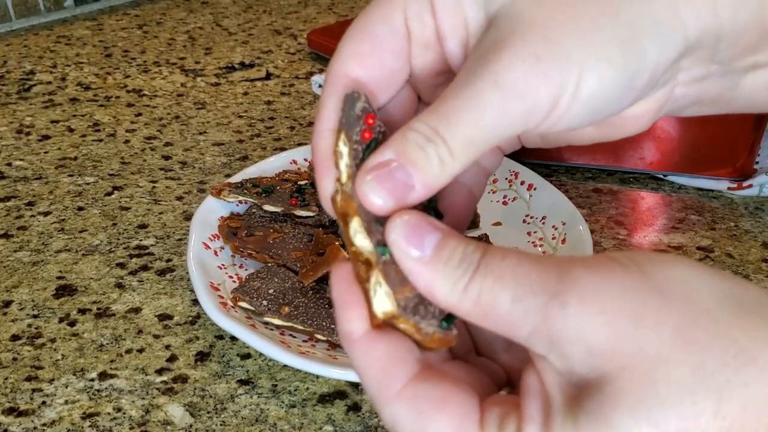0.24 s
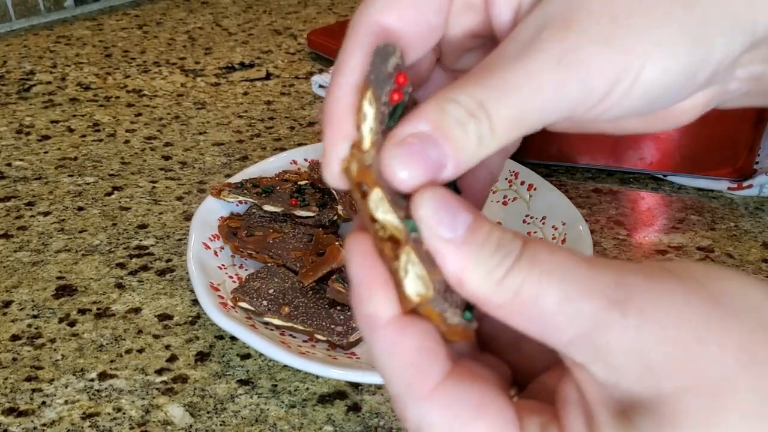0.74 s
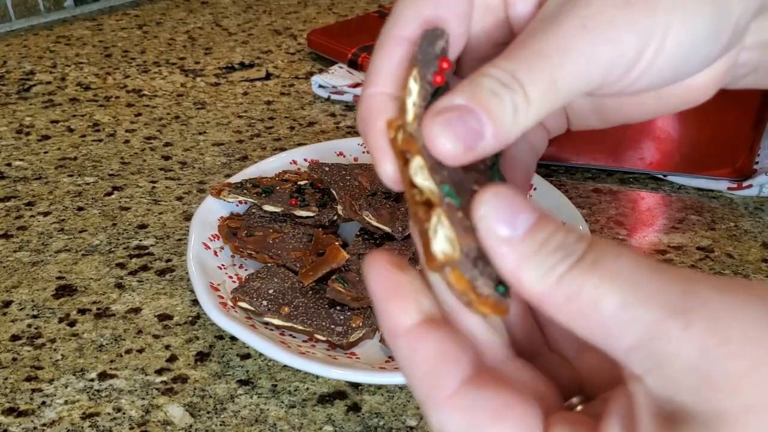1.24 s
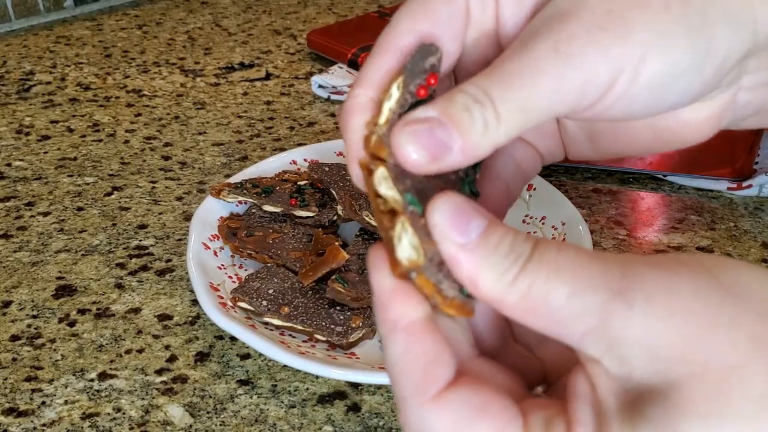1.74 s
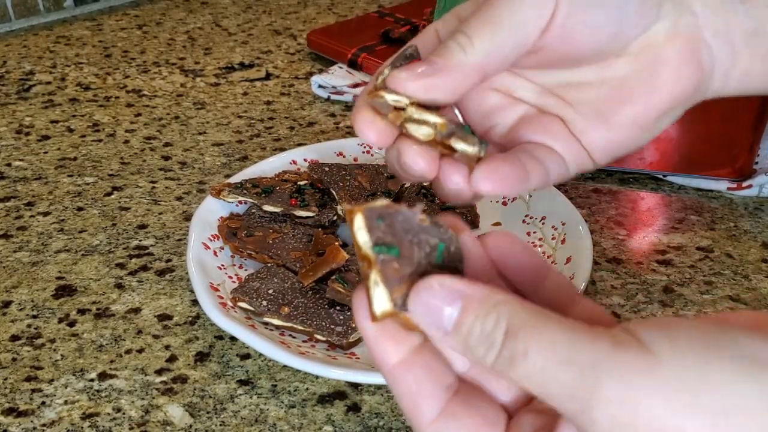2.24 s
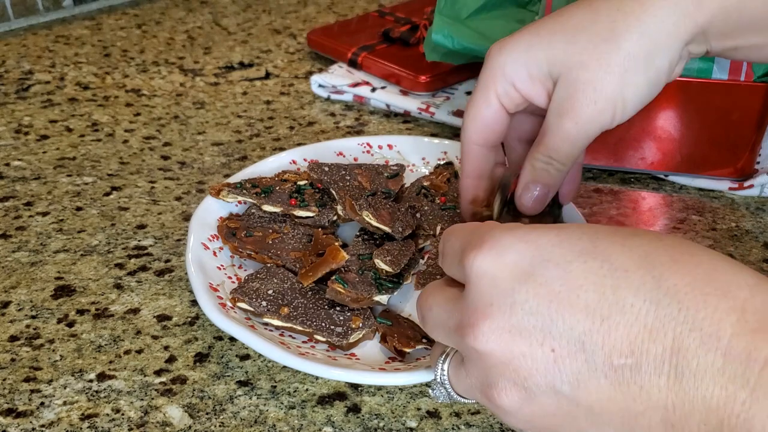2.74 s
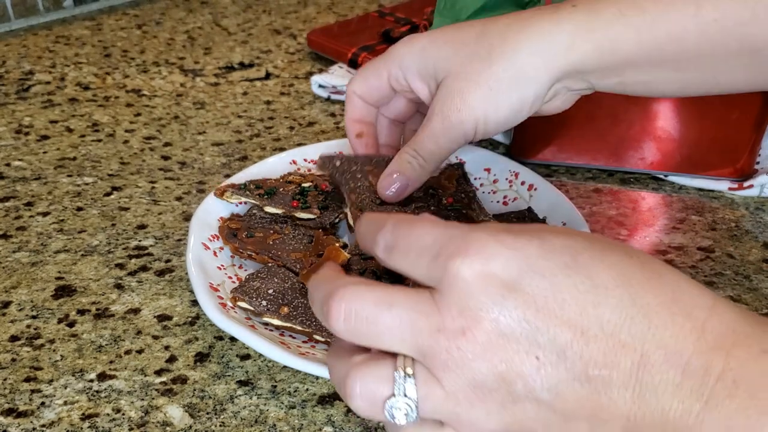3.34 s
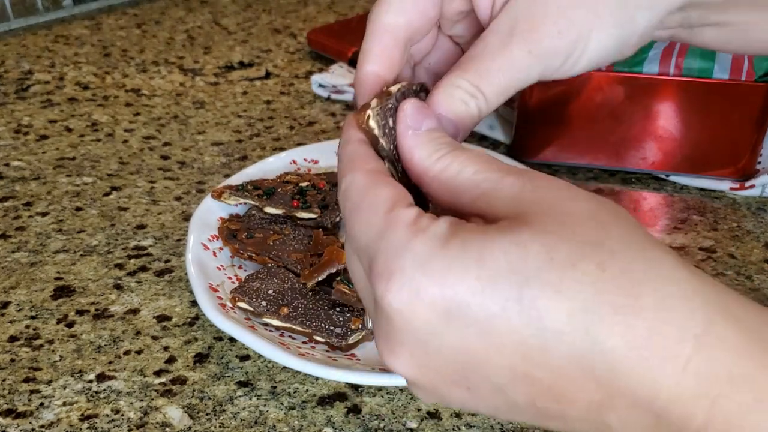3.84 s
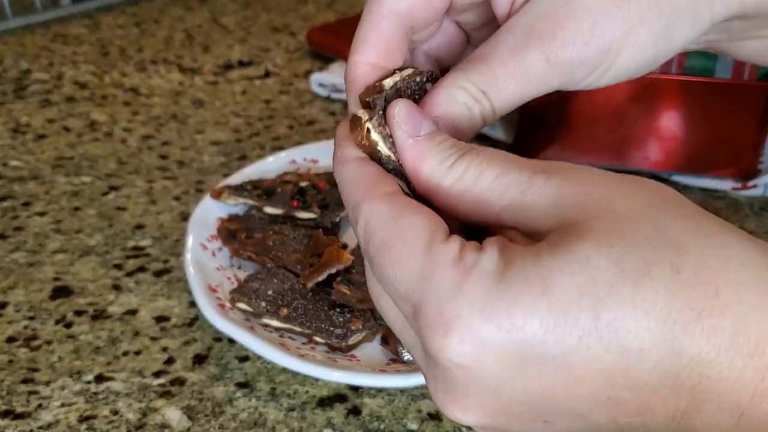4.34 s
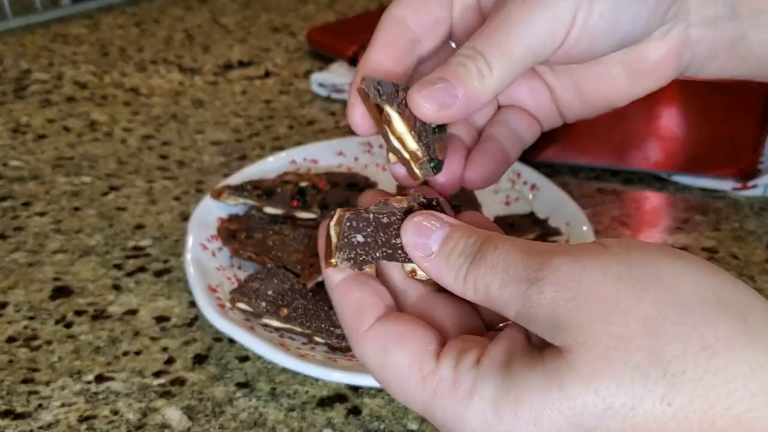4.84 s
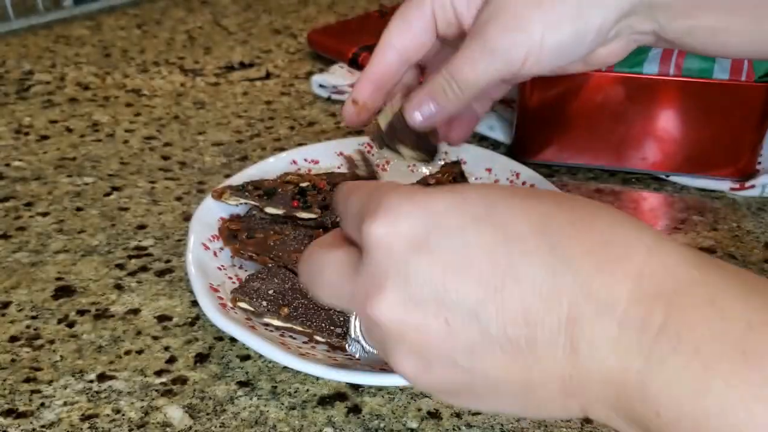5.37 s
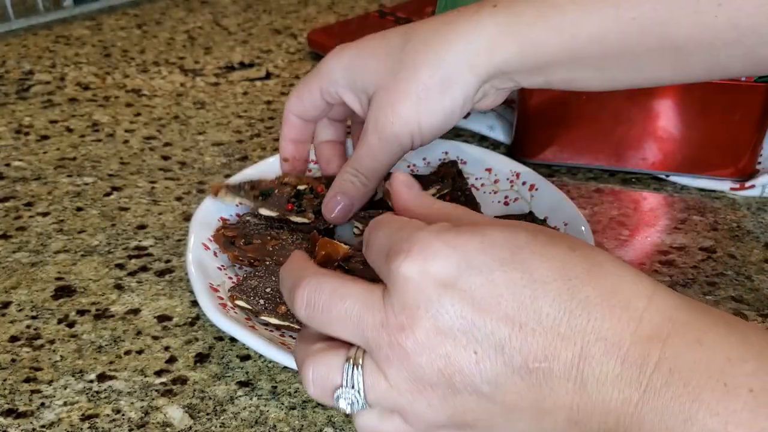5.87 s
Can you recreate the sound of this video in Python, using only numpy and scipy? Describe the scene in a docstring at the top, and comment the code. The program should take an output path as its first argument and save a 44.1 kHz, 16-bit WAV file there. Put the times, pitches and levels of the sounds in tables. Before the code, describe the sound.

Hard, bright fractures of toffee bark, each only an instant long, with tiny ticks before and after. Between two rounds of breaking, pieces rattle, scrape and crunch on a loaded china plate, giving brief clinks. Close stereo microphone, short bright answer from a small kitchen, faint tin shimmer, steady low hum and moving air underneath.

```python
"""A low appliance hum and moving air in a small kitchen, then toffee ticks under strain and cracks sharply.
Close up, hands bend and snap slabs of toffee pretzel bark over a china plate on a stone counter.
Fractures and ticks are short noise bursts; pieces knock with rattles and short modes, and ring the china.
Rubbing and dragging are random grains over hiss; a singing plate is narrow noise on one plate mode.
Dense, decaying noise answers as the room, a tin shimmers faintly, and one stereo microphone takes it all."""
import sys
import numpy as np
from scipy import signal
from scipy.fft import rfft, irfft, next_fast_len
from scipy.io import wavfile
from scipy.ndimage import map_coordinates

SR = 44100
rng = np.random.default_rng(int(sys.argv[2]) if len(sys.argv) > 2 else 0)


def file_out(sig):
    """Save sig as 16-bit WAV at sys.argv[1]."""
    # one column per channel
    cols = np.atleast_2d(sig).T
    # limit, then scale
    lim = np.clip(cols, -1, 1)
    pcm = np.round(lim * 32767).astype(np.int16)
    wavfile.write(sys.argv[1], SR, pcm)


N = 269421  # samples

# All levels are relative; pan_db is left over right.
# appliance tones: pitch_hz, level_db, waver (0-1)
HUM_TONES = [(57.3, -50, 0.9), (97.3, -55.5, 0.9), (120.3, -45, 0.2), (175.4, -70.5, 0.73),
             (272, -61.5, 0.9), (350.8, -67, 0.7)]
# shape of the moving air, before AIR_DB sets its level: pitch_hz, density_db (per Hz)
AIR_SPECTRUM = [(24, -31), (40, -5), (75, -6.5), (124, -7.5), (144, -16), (167, -9), (363, -16),
                (615, -28.5), (896, -31.5), (1210, -40.5), (1440, -40), (5870, -54), (14800, -48),
                (16000, -67)]
# how alike the air is left and right, negatives taken as 0: pitch_hz, likeness (0-1)
AIR_LEFT_RIGHT = [(60, 0.79), (150, 0.96), (380, 0.74), (950, -0.031), (2380, -0.84), (5980, -0.11),
                  (15000, -0.08)]
AIR_DB = -47.5

# slabs bent by hand, ticking at random: start_s, length_s, level_db
BEND_STROKES = [(.28, 0.27, -29), (1.2, .35, -35.5), (3.96, 0.34, -28.5), (4.93, 0.24, -31)]
# the clearest ticks: start_s, level_db, pan_db
CLEAR_TICKS = [(.074, -27.5, 0), (0.365, -23, -3), (0.384, -15.5, -1.5), (.693, -25.5, -6),
               (0.83, -21, -3.5), (.928, -21.5, -4), (.98, -23, 3), (1.2352, -21, -2), (1.305, -26, 2),
               (1.53, -17.5, -2.5), (4.131, -19.5, 5), (4.179, -21, 0), (4.473, -18, -3), (4.491, -17, -4),
               (4.606, -22.5, -2), (4.894, -22, -4.5), (4.9, -20, -2), (5.291, -28, -4)]
TICKS_PER_S, TICK_S, TICK_RISE_S = 26, .0014, .0002
TICK_SPREAD_DB, TICK_LOW_HZ = 3.5, 5500

# fractures: start_s, level_db, length_s, low_edge_hz, piece_pitch_hz, piece_level_db, pan_db
FRACTURES = [(0.138, 3, .0013, 2192, 2180, -10, 0.5), (.18, -8, .0022, 2900, 6900, -5, 2),
             (0.4855, 8, .0006, 4000, 9750, -4.5, -2.5), (0.4868, 6, 0.0015, 1300, 2450, -9, -8.5),
             (1.4517, -8, 0.0014, 2260, 3390, -8.5, -0.5), (1.5529, -1.5, .0018, 1200, 11300, 2, 10.5),
             (3.952, -15, 0.00078, 3510, 4260, -13, -1.5), (4.0, -13, .0015, 3750, 6500, -10.5, -1),
             (4.011, -9, .001, 4000, 12500, -10.5, -3.5), (4.024, -1, 0.00057, 4600, 4720, -7, -4),
             (4.046, -5.5, .0018, 4550, 13600, -4.5, 5), (4.2344, 11.5, 0.001, 2834, 6080, -0.5, -5),
             (4.2365, -7, 0.00059, 3004, 3340, 1, 1)]
# brightness of breaking toffee: pitch_hz, level_db
TOFFEE_COLOUR = [(900, 2), (2500, -6), (3500, -1), (4700, -8), (6300, 4), (8000, -5), (9700, 5.5),
                 (11000, -5.5), (13000, 2), (16000, 0.5)]
# brightness of a fracture as it spreads into the room: pitch_hz, level_db
SPREADING_COLOUR = [(300, 1.5), (1200, 1), (2500, -0.5), (4700, -3.5), (6300, -0.5), (9700, -0.5),
                    (16000, -2)]
TEAR_LEAD_S, TEAR_S, TEAR_DB = .0048, 0.0099, -18  # faint tearing ahead of each fracture
THUMP_DB, THUMP_GROWTH = -28, 2.09  # jerk of the hands at a 0 dB fracture; dB gained per dB of fracture
HALVES_ROOM_DB = -16  # the halves as sent to the room
TIN_DB, TIN_T60_S = -26, .48

# pieces touching the plate: start_s, knock_db, ring_db, hardness_hz (higher modes fade), crunch_db
PLATE_TOUCHES = [(2.766, -4.5, -23, 12000, -13.5), (2.792, 3.5, -7.5, 15000, -10.5),
                 (2.8379, 3, -21, 9000, -34), (2.871, 0.5, -11.5, 3450, -29), (2.905, 4, -9.5, 9000, -24),
                 (2.9215, 15, 6, 13100, -26), (2.925, 10.5, -25, 12200, -17), (2.974, 7, 0, 16000, -4),
                 (3.269, -11.5, -16, 2600, -17.5), (3.345, -26, -26, 2400, -5.5),
                 (3.401, -6, -18, 2450, 4.5), (3.413, -4.5, -11, 2620, -22),
                 (3.522, -1.5, -9.5, 2600, -7.5), (3.532, 3, -25, 2580, -30), (3.584, -0.5, -21, 5500, -33),
                 (3.641, -5, -14.5, 2600, -15.5), (5.5702, -5.5, -41, 2800, -7.5),
                 (5.5932, 4.5, -4.5, 2850, 5), (5.652, 0.5, -30, 2820, -20), (5.691, 9, -7, 2470, -3),
                 (5.79, -14, -16, 10100, -32), (5.898, -6, -27, 3480, -18), (5.921, -16, -18, 2930, -7),
                 (5.97, -8, -14, 3200, -3.5), (6.071, -9.5, -11, 3060, -6.5), (6.094, -3, -21, 3000, -10.5)]
# modes of the china plate: pitch_hz, level_db, t60_s
PLATE_MODES = [(574, -46, .3), (765, -41, .12), (822, -38, .3), (957, -42, .28), (1868, -35, .15),
               (2468, -34, .18), (3090, -33, .04), (3172, -27, .08), (3248, -28, .22), (4226, -37, .08),
               (5076, -37, .15), (7047, -41, .1), (9195, -35, .16), (11560, -41, .09), (14250, -41, .09)]
# dull knock of toffee on the laden plate: pitch_hz, level_db
KNOCK_COLOUR = [(100, -9.5), (220, -1.5), (330, -12), (480, 2.5), (660, -5), (830, 7.5), (1080, -3),
                (1700, -3), (2400, -7), (3400, -8), (5000, -21.5), (8000, -26), (16000, -35)]
# brittle crunch of crumbs: pitch_hz, level_db
CRUNCH_COLOUR = [(300, -22.5), (1500, -33.5), (3500, -3), (6300, -2.5), (8000, -6), (9700, 1.5),
                 (11000, -6.5), (13000, 2), (16000, -6)]
RATTLE_S, CHINA_LEFT_DB = .006, 4.5

# the hands swell, hold and let go in every stroke
STROKE_ATTACK_S, STROKE_RELEASE_S = 0.088, 0.067
# fingers and pieces rubbing: start_s, length_s, level_db
RUB_STROKES = [(.8, 0.22, -63.5), (1.19, 0.34, -63), (2.78, 0.33, -54.5), (3.02, 0.25, -51),
               (3.25, 0.39, -51), (4.44, 0.11, -50.5), (4.51, .18, -66), (4.88, 0.28, -69.5),
               (5.57, 0.29, -50.5), (5.85, 0.27, -53.5)]
# colour of the rubbing: pitch_hz, density_db (per Hz)
RUB_COLOUR = [(880, -36), (1500, -20), (2940, -4.5), (3250, -7), (5830, -7), (6630, -6.5), (7690, -6.5),
              (14900, -3), (16000, -15)]
# skin on skin as the hands move to the plate and back: start_s, length_s, level_db
BRUSH_STROKES = [(2.59, 0.16, -57), (3.76, 0.094, -62), (5.27, 0.12, -64.5), (5.36, 0.27, -69)]
# colour of brushing skin: pitch_hz, density_db (per Hz)
SKIN_COLOUR = [(1500, -13), (4400, -8), (6000, -13), (9400, 2), (11500, -11), (16000, -13)]
# broken faces scraping past each other: start_s, length_s, level_db
PARTING_STROKES = [(1.787, 0.069, -43.5)]
# colour of the scrape: pitch_hz, level_db
SCRAPE_COLOUR = [(700, -22), (1500, 0), (2000, -9.5), (2600, 1.5), (3700, 3.5), (5500, -5), (9000, -4),
                 (12500, 0), (16000, -8)]
# pieces dragged over the plate: start_s, length_s, level_db
DRAG_STROKES = [(2.78, 0.17, -50.5), (3.01, 0.23, -54), (3.27, 0.3, -53), (3.39, 0.31, -48.5),
                (3.65, 0.26, -66.5), (5.56, 0.067, -34.5), (5.83, 0.23, -45)]
JOSTLES_PER_S, JOSTLE_SPREAD_DB = 28, 3.5  # a dragged piece bumps its neighbours at random
JOSTLE_KNOCK_DB, JOSTLE_CRUNCH_DB = 36.5, 26  # a bump over the level of the drag
# a sliding piece makes one plate mode sing: start_s, length_s, pitch_hz, level_db
PLATE_SINGS = [(2.853, 0.057, 2494, -38), (3.244, 0.19, 2520, -52), (3.585, 0.045, 5030, -55),
               (5.8, .16, 3100, -55)]

# how long the kitchen answers: pitch_hz, t60_s
KITCHEN_T60 = [(150, 0.99), (1000, 0.36), (5000, 0.3), (10000, 0.31), (16000, 0.26)]
# how strongly the kitchen answers: pitch_hz, level_db
KITCHEN_COLOUR = [(150, -4), (1000, -5.5), (2000, -8), (4000, -3), (6300, -7.5), (8000, -13.5), (13000, -6),
                  (16000, -13.5)]
CUTOFF_HZ = 15950

T = np.arange(N) / SR
SHORT = T[:4096]


def from_db(db):
    """Amplitude factor of a level in dB."""
    return 10 ** (np.asarray(db) / 20)


def rms_one(x):
    """Scale to an RMS of 1."""
    return x / np.sqrt(np.mean(x ** 2) + 1e-20)


def energy_one(x):
    """Scale each side to an energy of 1."""
    return x / np.sqrt(np.sum(x ** 2, axis=-1, keepdims=True) + 1e-20)


def at_hz(points, hz):
    """Read a table at a pitch, interpolating along log frequency."""
    pitches, values = np.array(points).T
    return np.interp(np.log(hz + 1e-9), np.log(pitches), values)


def panned(x, pan_db):
    """Raise the left over the right by pan_db."""
    return x * from_db([[pan_db / 2], [-pan_db / 2]])


def add(out, s, x):
    """Mix a stereo sound in, starting at s seconds."""
    at = round(s * SR)
    out[:, at:at + x.shape[1]] += x[:, :N - at]


def cut(x, hz, kind, order=2):
    """Causal low-, high- or band-pass."""
    return signal.sosfilt(signal.butter(order, hz, kind, fs=SR, output="sos"), x)


def colour(x, spectrum, size=2048):
    """Causal (minimum-phase) filter with the response of a pitch_hz, level_db table."""
    gain = from_db(at_hz(spectrum, np.fft.rfftfreq(size, 1 / SR)))
    cepstrum = irfft(np.log(gain))
    # folding the cepstrum forward in time makes the phase minimal
    cepstrum[1:size // 2] *= 2
    cepstrum[size // 2 + 1:] = 0
    response = irfft(np.exp(rfft(cepstrum)))
    return signal.fftconvolve(x, response[None], axes=1)[:, :x.shape[1]]


def drift(rate, size=64):
    """Slow random wander of RMS 1, with rate knots per second."""
    knots = rng.standard_normal(int(T[-1] * rate) + 4)
    coarse = map_coordinates(knots, [T[::size] * rate + 1], order=3, mode="nearest")
    return rms_one(np.interp(T, T[::size], coarse))


def stereo_noise(alike, size):
    """White noise, partly shared by the two sides."""
    share = np.clip(alike, 0, 1)
    shared = np.sqrt(share) * rng.standard_normal(size)
    return shared + np.sqrt(1 - share) * rng.standard_normal((2, size))


def pressure(strokes):
    """How hard the hands work over time: each stroke has an attack, a hold and a release."""
    total = np.zeros(N)
    for s, length, db in strokes:
        attack = (T - s) / STROKE_ATTACK_S
        release = (s + length - T) / STROKE_RELEASE_S
        total += from_db(db) * np.clip(np.minimum(attack, release), 0, 1)
    return total


def scatter(strokes, per_s, spread_db, sounds):
    """Play the sounds in turn at random moments during the strokes, as strongly as the hands press."""
    out = np.zeros((2, N))
    happens = rng.random(N) < per_s / SR
    sizes = pressure(strokes) * happens * from_db(spread_db * rng.standard_normal(N))
    for k, at in enumerate(np.flatnonzero(sizes)):
        add(out, at / SR, sizes[at] * sounds[k % len(sounds)])
    return out


def burst(length, alike=0.064, rise=0.00047):
    """A run of micro-fractures that swells quickly and dies away; energy 1."""
    swell = (1 - np.exp(-SHORT / rise)) ** 2
    return energy_one(stereo_noise(alike, len(SHORT)) * swell * np.exp(-SHORT / length))


def ring(hz, t60, t, spread=0.84):
    """A decaying struck mode, its phase ahead on one side, chosen at random."""
    lead = spread * rng.choice([-1, 1]) * np.array([[1], [-1]])  # radians
    return np.sin(2 * np.pi * hz * t + lead) * from_db(-60 * t / t60)


def appliance():
    """Wavering motor and mains tones over the rumble of moving air."""
    hum = np.zeros(N)
    for hz, db, waver in HUM_TONES:
        wander = 1 + waver * (drift(7) + 1j * drift(12))  # in loudness and phase
        tone = np.exp(2j * np.pi * (hz * T + rng.random()))
        hum += from_db(db) * rms_one(np.real(wander * tone))
    size = next_fast_len(N, real=True)
    hz = np.fft.rfftfreq(size, 1 / SR)
    alike = np.clip(at_hz(AIR_LEFT_RIGHT, hz), 0, 1)
    mid, side = rfft(rng.standard_normal((2, size))) * from_db(at_hz(AIR_SPECTRUM, hz))
    spectra = np.sqrt(1 + alike) * mid + np.sqrt(1 - alike) * side * [[1], [-1]]
    air = irfft(spectra, size)[:, :N]
    fade_in = np.minimum(T / .004, 1)
    return fade_in * panned(hum + from_db(AIR_DB) * rms_one(air), -1.3)


def kitchen(x, first_echo=0.00085):
    """Diffuse reflections from the small room, dying away band by band."""
    t, response = T[:int(.8 * SR)], 0
    edges = np.geomspace(80, 18000, 17)
    onset = np.clip(t / first_echo - .5, 0, 1)
    for low, high in zip(edges, edges[1:]):
        hz = np.sqrt(low * high)
        fade = energy_one(from_db(-60 * t / at_hz(KITCHEN_T60, hz)) * onset)
        band = cut(stereo_noise(0.12, len(t)), [low, high], "band")
        response = response + from_db(at_hz(KITCHEN_COLOUR, hz)) * fade * band
    return signal.fftconvolve(x, response, axes=1)[:, :N]


def ticks(count=12):
    """Small cracks open in the toffee under strain, each a very short bright burst."""
    sounds = [burst(TICK_S, rise=TICK_RISE_S) for _ in range(count)]
    out = scatter(BEND_STROKES, TICKS_PER_S, TICK_SPREAD_DB, sounds)
    for s, db, pan_db in CLEAR_TICKS:
        add(out, s, from_db(db) * panned(burst(TICK_S, rise=TICK_RISE_S), pan_db))
    return colour(cut(out, TICK_LOW_HZ, "high", order=1), TOFFEE_COLOUR)


def snaps(piece_width=0.098, thump_hz=290, thump_t60=0.014, slab_hz=740, slab_t60=.008):
    """The fracture runs through the slab; the halves resonate broadly, damped by the fingers, and jerk the hands.
    Summed over all directions, the sound that spreads into the room is one even click."""
    cracks, halves, spreading = np.zeros((3, 2, N))
    click = np.tile(SHORT == 0, (2, 1)).astype(float)
    hands = energy_one(ring(thump_hz, thump_t60, SHORT, spread=0.4))
    slab = energy_one(ring(slab_hz, slab_t60, SHORT, spread=0.26))
    thump = hands + from_db(-9.5) * slab
    for s, db, length, low_hz, ring_hz, ring_db, pan_db in FRACTURES:
        bright = cut(burst(length), low_hz, "high")
        body = cut(burst(length, alike=0.92), 1400, "low")
        crack = bright + from_db(-19.5) * body
        piece_band = [ring_hz / (1 + piece_width), ring_hz * (1 + piece_width)]
        piece = energy_one(cut(burst(length / 2), piece_band, "band"))
        jerk = from_db(THUMP_DB + THUMP_GROWTH * db) * thump
        tear = cut(burst(TEAR_S), low_hz, "high")
        add(cracks, s - TEAR_LEAD_S, from_db(db + TEAR_DB) * tear)
        add(cracks, s, panned(from_db(db) * crack + jerk, pan_db))
        add(halves, s, from_db(db + ring_db) * piece)
        add(spreading, s + length, from_db(db) * cut(click, low_hz, "high") + jerk)
    return colour(cracks, TOFFEE_COLOUR), halves, colour(spreading, SPREADING_COLOUR)


def tin(x, low_hz=5200, high_hz=6900):
    """A metal tin next to the plate shimmers faintly after each crack: one decaying band of noise."""
    t = T[:SR // 2]
    band = cut(stereo_noise(0.18, len(t)), [low_hz, high_hz], "band")
    shimmer = energy_one(band * from_db(-60 * t / TIN_T60_S))
    return signal.fftconvolve(x, shimmer, axes=1)[:, :N]


def friction(strokes, spectrum, grains_per_s, grain_db):
    """Sugar grains catch and slip at random, over a smooth hiss, as strongly as the stroke presses."""
    happens = rng.random(N) < grains_per_s / SR
    catches = happens * from_db(4 * np.minimum(rng.exponential(1, N), 4))
    slip = np.exp(-1 / (0.00033 * SR))  # each catch dies away with a 0.33 ms time constant
    grip = rms_one(signal.lfilter([1], [1, -slip], catches + 1e-18))
    grit = stereo_noise(0.18, N) * (1 + from_db(grain_db) * grip)
    return pressure(strokes) * rms_one(colour(grit, spectrum))


def knock(piece_t60=0.028, piece_db=-12, count=6):
    """Toffee lands with a brief rattle; every piece has a few short modes of its own."""
    pitches = np.exp(rng.uniform(np.log(600), np.log(4500), count))
    modes = sum(ring(hz, piece_t60, SHORT, spread=0.9) for hz in pitches)
    piece = modes * (1 - np.exp(-SHORT / 0.0017))
    rattle = burst(RATTLE_S, alike=0.96, rise=0.0006)
    return rattle + from_db(piece_db) * energy_one(piece)


def touches(crumb_s=.0023, count=12):
    """Each touch knocks dully, rings the china and crushes crumbs; dragged pieces jostle in between."""
    bumps = [knock() for _ in range(count)]
    knocks = from_db(JOSTLE_KNOCK_DB) * scatter(DRAG_STROKES, JOSTLES_PER_S, JOSTLE_SPREAD_DB, bumps)
    crushes = [burst(crumb_s) for _ in range(count)]
    crumbs = from_db(JOSTLE_CRUNCH_DB) * scatter(DRAG_STROKES, JOSTLES_PER_S, JOSTLE_SPREAD_DB, crushes)
    china = np.zeros((2, N))
    modes = [(hz, db, ring(hz, t60, T[:SR // 2])) for hz, db, t60 in PLATE_MODES]
    for s, knock_db, ring_db, hard_hz, crunch_db in PLATE_TOUCHES:
        add(knocks, s, from_db(knock_db - 3.0) * knock())
        add(crumbs, s, from_db(crunch_db - 6.5) * burst(crumb_s))
        for hz, db, tone in modes:
            # soft chocolate hardly excites the high modes
            reach = 1 / (1 + (hz / hard_hz) ** 6)
            add(china, s, from_db(ring_db + db + rng.normal(0, 1.4)) * reach * tone)
    clatter = panned(colour(knocks, KNOCK_COLOUR), 1.5) + colour(crumbs, CRUNCH_COLOUR)
    return clatter, panned(from_db(-3.5) * china, CHINA_LEFT_DB)


def singing(width_hz=55):
    """Stick and slip feed one plate mode, heard as narrow noise that swells and fades with the stroke."""
    out = np.zeros((2, N))
    for s, length, hz, db in PLATE_SINGS:
        swell = np.hanning(round(length * SR))
        tone = rms_one(cut(stereo_noise(0.32, SR // 2), [hz - width_hz, hz + width_hz], "band"))
        add(out, s, from_db(db) * swell * tone[:, -len(swell):])  # the filter has settled by then
    return out


def scene():
    """Hands and plate close to the microphone, the kitchen around them, over the hum."""
    rubbing = friction(RUB_STROKES, RUB_COLOUR, grains_per_s=160, grain_db=-7.5)
    brushing = friction(BRUSH_STROKES, SKIN_COLOUR, grains_per_s=67, grain_db=-5)
    parting = friction(PARTING_STROKES, SCRAPE_COLOUR, grains_per_s=373, grain_db=-1.5)
    dragging = from_db(-7.5) * friction(DRAG_STROKES, KNOCK_COLOUR, grains_per_s=140, grain_db=-17.5)
    cracks, halves, spreading = snaps()
    clatter, china = touches()
    crackle = ticks() + parting
    # the halves are shielded by the fingers, the china by its load: less of them reaches the room
    shielded = from_db(HALVES_ROOM_DB) * halves + from_db(-3) * china
    room = kitchen(spreading + crackle + from_db(2.0) * clatter + shielded)
    hands = cracks + halves + crackle + rubbing + brushing
    plate = clatter + china + singing() + dragging
    shimmer = from_db(TIN_DB) * tin(spreading + halves)
    return hands + plate + shimmer + room + appliance()


def record(dry):
    """The microphone loses the deepest rumble and rounds the highest peaks; the top is cut steeply."""
    rounded = 1.1 * np.tanh(cut(dry, 22, "high") / 1.1)
    return signal.sosfilt(signal.ellip(12, .1, 80, CUTOFF_HZ, fs=SR, output="sos"), rounded)


dry = scene()
out = record(dry)
file_out(out)
```